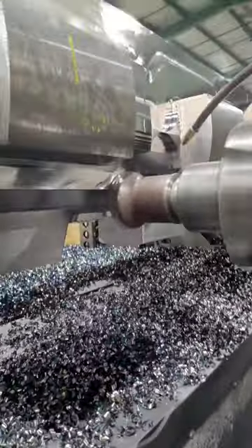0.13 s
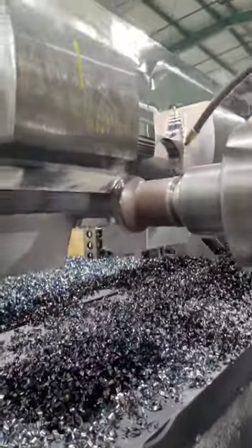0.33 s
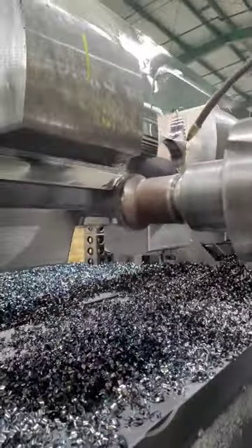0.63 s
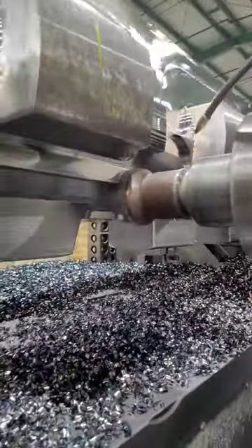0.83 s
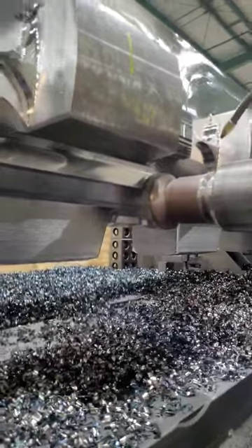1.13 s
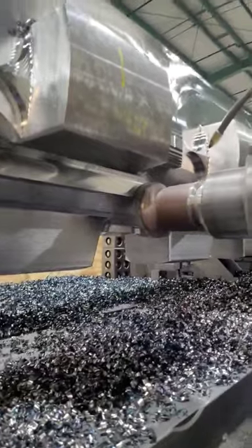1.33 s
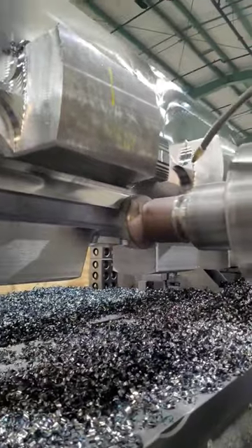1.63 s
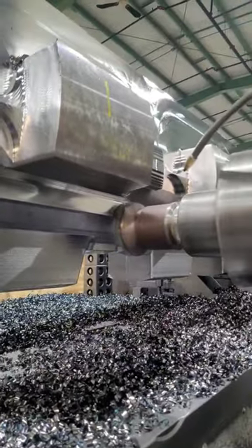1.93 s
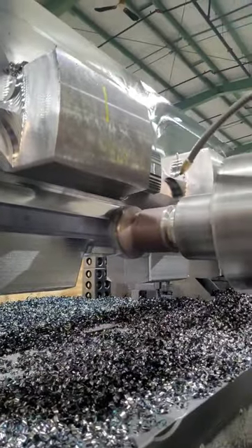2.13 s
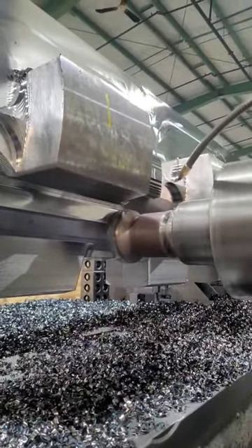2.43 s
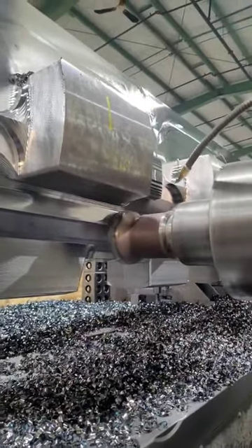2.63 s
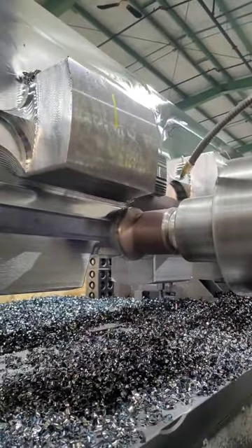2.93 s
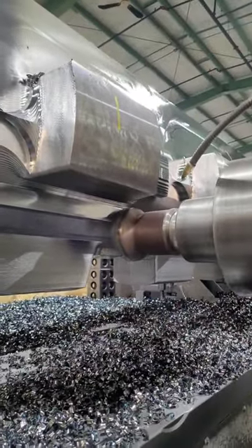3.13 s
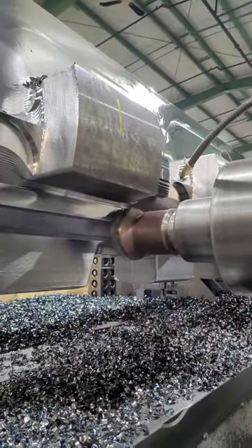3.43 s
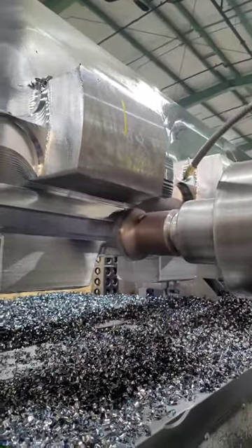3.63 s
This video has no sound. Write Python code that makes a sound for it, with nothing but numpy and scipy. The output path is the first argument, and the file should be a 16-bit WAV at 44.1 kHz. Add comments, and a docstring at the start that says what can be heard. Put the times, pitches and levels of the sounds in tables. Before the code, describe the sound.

A large milling machine cuts steel with rapid, ringing knocks under a high, throbbing whine. An air blast hisses over the factory hall's low rumble throughout, the balance shifting slightly as the close microphone moves.

```python
"""Rapid, ringing knocks under a high, throbbing whine: a large milling machine cuts steel in a factory hall.
A seven-tooth cutter strikes the machine on every turn and sets its parts ringing, from bed to cutter head.
The drive holds one high tone, an air blast hisses over the hall's rumble, and noise rings in drive and
guards. Levels and balance shift as the close stereo microphone slowly moves."""
import sys
import numpy as np
from scipy import signal
from scipy.io import wavfile

SR = 44100
rng = np.random.default_rng(int(sys.argv[2]) if len(sys.argv) > 2 else 0)


def dump_mix(stems):
    """Bounce the given channels to the path in sys.argv[1] as a 16-bit WAV at rate SR."""
    frames = np.atleast_2d(stems).T  # one column per channel
    limited = np.clip(frames, -1, 1)  # hard clip at full scale
    pcm = np.round(limited * 32767).astype(np.int16)
    wavfile.write(sys.argv[1], SR, pcm)


N = 166257

TURNS_PER_S, WHINE_HZ = 7.576, 4529.3

# Ringing modes of the seven machine parts. Pan is left minus right throughout.
# pitch_hz, level_db, t60_s, pan_db, right_lag_ms, signed_gain
BED_MODES = [(54.3, -50.5, 0.7, -3.8, 1.41, 1.0), (98.4, -33.6, 0.7, 0.3, 0.26, 1.0),
             (124.0, -31.7, 0.7, -0.7, 0.19, 1.0)]
COLUMN_MODES = [(142.0, -35.5, 0.213, -1.1, 0.01, 1.0), (159.8, -42.0, 0.7, -0.3, 0.32, 1.0),
                (180.4, -32.6, 0.087, -3.5, -0.13, -1.0), (201.6, -30.5, 0.255, -3.5, 0.21, 1.0),
                (215.5, -30.5, 0.7, -4.2, 0.15, -1.0)]
SADDLE_MODES = [(252.0, -35.0, 0.7, -1.2, -0.02, -1.0), (280.1, -43.1, 0.7, -0.9, -0.02, -1.0),
                (304.6, -40.0, 0.524, -3.9, -0.3, -1.0), (317.8, -35.4, 0.7, -2.2, -0.17, -1.0),
                (334.3, -46.4, 0.7, -3.2, -0.29, 1.0), (373.1, -47.3, 0.7, 6.0, -0.92, -1.0)]
HOUSING_MODES = [(380.3, -39.9, 0.237, 4.8, -0.42, 1.0), (424.7, -43.8, 0.7, -1.0, 0.13, 1.0),
                 (477.5, -49.4, 0.7, 0.3, -0.39, 1.0), (511.6, -46.6, 0.139, 1.6, -0.02, -1.0),
                 (577.7, -43.7, 0.7, -7.2, 0.1, -1.0)]
ARBOR_MODES = [(632.8, -49.1, 0.7, -8.0, 0.16, 1.0), (683.8, -47.4, 0.3, -4.0, 0.0, 1.0),
               (737.7, -40.3, 0.107, -2.9, 0.07, -1.0), (793.1, -38.0, 0.04, 3.0, -0.09, -1.0),
               (852.2, -36.3, 0.052, -5.4, -0.18, 1.0)]
WORKPIECE_MODES = [(908.9, -44.2, 0.202, -3.9, 0.11, -1.0), (967.6, -39., 0.26, -8.0, -0.03, 1.0),
                   (1125.8, -43., 0.437, -3.4, 0.07, 1.0), (1178.0, -43., 0.7, -4.1, 0.13, -1.0)]
HEAD_MODES = [(1006.5, -33, 0.15, -6.5, 0.56, 0.76), (1075, -34.5, 0.12, 4.5, 0.28, -1.14),
              (1182, -35.5, 0.041, -7, 0.11, 1.0), (1293, -29.5, 0.03, -6, 0.3, -1.2)]
# A row per tooth, a column per part, bed to head: push_share (of the hardest; negative springs back)
TOOTH_PUSH = [(0.85, -0.73, -0.12, 0.95, -0.11, 0.25, 0.5), (0.84, 0.42, -0.38, -0.9, 1.0, 1.0, 0.15),
              (0.7, 0.51, 0.49, 0.94, 0.72, 1.0, 0.4), (0.42, 1.0, 1.0, 1.0, 0.58, 0.59, 1.0),
              (0.41, 0.24, -0.3, 0.11, 0.38, 0.71, 0.9), (1.0, -0.6, 0.56, -0.06, 0.86, 0.66, 0.4),
              (0.73, 0.97, 0.27, 0.65, 0.71, 0.44, 0.55)]
# When the first tooth reaches each part within a turn: delay_ms
PUSH_DELAY_MS = [8.12, 10.8, 3.27, 14.62, 18.2, 16.5, 1.5]
# Each part's fade at the moving microphone, from the start of the pre-roll: gain_db, slope_db_per_s
PART_FADES = [(-1.8, 0.35), (1., -0.12), (-1.2, 0.51), (1.8, -0.24), (1.6, -0.28), (-2., 0.25), (-3., 1.1)]
# Level ride on knocks and rumble: time_s, gain_db
LOW_RIDE = [(0, 2.5), (.9, 0.74), (1.8, -0.6), (2.8, -0.63), (3.77, -0.1)]

# Tone of the hall's rumble and of the air blast: pitch_hz, band_gain_db
RUMBLE_EQ = [(30, -5), (70, -13), (130, -3), (260, -4), (400, -7), (600, -14.5), (1000, -7), (1350, -16.5),
             (2000, -13.5), (3000, -14.5)]
HISS_EQ = [(2000, -30), (3200, -8.5), (4000, 1.5), (6000, -0.5), (7500, 0), (8600, -5.5), (10000, -2.5),
           (11300, -1.5), (12500, 2), (13500, 2), (15600, 1)]
# How much of the noise both channels have in common: pitch_hz, common_share
NOISE_COMMON = [(60, .9), (300, .8), (700, .45), (1500, .1), (4000, .25), (15000, .2)]
# Sideways lean of the noise: pitch_hz, pan_db
NOISE_PAN = [(60, 1), (2000, -0.5), (6000, 2.5), (9000, 5.5), (12000, 0.5), (15000, -1.5)]
# Resonances of drive and guards: pitch_hz
RESONANCE_HZ = [71.7, 108, 500.1, 543, 1502, 1995, 4195, 4529, 4836, 4996, 5270, 5680, 7110, 9363, 13050]
# Shape of each of those resonances: width_hz, start_level_db, slope_db_per_s
RESONANCE_SHAPES = [(3.98, -44.5, -0.5), (2.75, -39.5, -3), (2.02, -46, -0.15), (30.4, -45, -.5),
                    (38, -48.5, -1), (140, -47.5, 0.34), (50, -50, 1.5), (78, -28.5, -1.3), (53, -42, 2),
                    (80, -40.5, 0), (45, -39.5, -3), (250, -33, -5), (300, -58, 3), (60.3, -39, -3),
                    (150, -47, 0.5)]
# Ride on hiss and resonances as the microphone turns: time_s, gain_db, pan_db
AIR_RIDE = [(0, 3, -3), (.6, 2, -3), (1.2, 2.5, -4), (1.9, 1, -4.5), (2.5, 1, -5), (3.1, 0.2, -5),
            (3.77, 0.7, -3.5)]

# The whine's three partials at the moving microphone: time_s, left_db, right_db, extra_left_path_mm,
# second_left_db, second_right_db, third_left_db, third_right_db
WHINE_PATH = [(0, -23, -23, 38, -35, -42, -36, -43), (.15, -18, -31, 38, -35, -42, -35, -43),
              (.3, -17, -20.5, 21, -32, -47, -36, -40), (.5, -24, -16, 22, -31, -47, -43, -43),
              (.8, -25, -32, -4, -33.5, -36, -52, -36), (.97, -35, -21, -2, -33.5, -36, -52, -34),
              (1.2, -26, -20.5, 23, -37, -37, -52, -42), (1.5, -25.5, -20, 17, -39.5, -40.5, -55, -35),
              (1.7, -27.5, -15.5, 16, -34, -39, -55, -33), (2.2, -25.5, -13, 35, -34.5, -40, -55, -32),
              (2.6, -23.5, -15, 43, -33, -39.5, -48, -37.5), (3.0, -26.5, -19, 56, -33, -51, -50, -39),
              (3.4, -27, -21, 68, -38, -54, -45, -47), (3.77, -37, -21, 55, -36, -43, -48, -46)]
# Each partial in the right channel, the second one flipped: polarity
RIGHT_POLARITY = [1, -1, 1]
# Side tones that make the whine throb: offset_in_turn_rates, level_db, start_phase_rad
SIDE_TONES = [(-8, -41, -1.2), (-7, -40, 1.2), (-4, -40, -1.3), (-2, -35, -1.4), (2, -36, .9),
              (4, -41, 2.1), (7, -44, .3)]


def from_db(db):
    """Decibels to gain."""
    return 10 ** (np.asarray(db) / 20)


def unit_rms(x):
    """Normalise to an rms of 1."""
    return x / np.sqrt(np.mean(x ** 2) + 1e-20)


def automation(rows):
    """One curve per column, gliding between the times in the first."""
    times, *columns = np.transpose(rows)
    return [np.interp(np.arange(N) / SR, times, column) for column in columns]


def at_pitch(points, hz):
    """Read a curve along a logarithmic pitch axis."""
    pitches, values = np.transpose(points)
    return np.interp(np.log(hz), np.log(pitches), values)


def drift(rate_hz):
    """Smooth random modulation with a spread of about 1."""
    hop, settle = 40, 2000
    pole = np.exp(-2 * np.pi * rate_hz * hop / SR)
    white = rng.standard_normal(N // hop + settle + 2)
    slow = signal.lfilter([1], [1, -2 * pole, pole * pole], white)[settle:]
    return np.interp(np.arange(N) / hop, np.arange(len(slow)), unit_rms(slow))


def pan(pan_db):
    """Left and right gains; positive leans left."""
    return from_db(np.array([[.5], [-.5]]) * pan_db)


def cutter_knocks(scatter_db=.4, preroll_s=1.1):
    """Evenly spaced teeth strike every part's modes; a pre-roll has them ringing from the outset."""
    hit_s = np.arange(-56, 210) / (7 * TURNS_PER_S) + preroll_s
    out = np.zeros((2, N + 2 * SR))
    parts = [BED_MODES, COLUMN_MODES, SADDLE_MODES, HOUSING_MODES, ARBOR_MODES, WORKPIECE_MODES, HEAD_MODES]
    for part, modes in enumerate(parts):
        gain_db, slope = PART_FADES[part]
        blows = np.resize(np.array(TOOTH_PUSH)[:, part], len(hit_s))
        blows = blows * from_db(gain_db + slope * hit_s + scatter_db * rng.standard_normal(len(hit_s)))
        for hz, db, t60, pan_db, lag_ms, signed_gain in modes:
            clicks = np.full(out.shape, 1e-18)
            for channel, late_ms in enumerate([-lag_ms / 2, lag_ms / 2]):
                arrival_s = hit_s + (PUSH_DELAY_MS[part] + late_ms) / 1000
                clicks[channel, np.round(arrival_s * SR).astype(int)] = blows
            pole, angle = from_db(-60 / (t60 * SR)), 2 * np.pi * hz / SR
            ring = signal.lfilter([0, np.sin(angle)], [1, -2 * pole * np.cos(angle), pole * pole], clicks)
            out += signed_gain * from_db(db) * pan(pan_db) * ring
    start = round(preroll_s * SR)
    return out[:, start:start + N]


def stereo_white(right_lag_s=.00012):
    """Common noise that reaches the right channel late, and each channel's own noise."""
    common, own = rng.standard_normal(N), rng.standard_normal((2, N))
    return np.array([common, np.roll(common, int(right_lag_s * SR))]), own


def place_noise(white, hz):
    """Blend common and own noise to the stereo width and lean of this pitch."""
    common, own = white
    share = at_pitch(NOISE_COMMON, hz)
    return pan(at_pitch(NOISE_PAN, hz)) * (np.sqrt(share) * common + np.sqrt(1 - share) * own)


def flickering_noise(eq, low_hz, bands, per_octave, flicker_db):
    """A stack of narrow noise bands, each flickering on its own; rms 1."""
    out, whites = 0, [stereo_white(), stereo_white()]
    edges = low_hz * 2 ** (np.arange(bands + 1) / per_octave)
    for k, (low, high) in enumerate(zip(edges, edges[1:])):
        hz = np.sqrt(low * high)
        bandpass = signal.butter(2, [low, high], "band", fs=SR, output="sos")
        band = signal.sosfilt(bandpass, place_noise(whites[k % 2], hz))
        out = out + from_db(at_pitch(eq, hz) + flicker_db * drift(12)) * band
    return unit_rms(out)


def hall_rumble():
    """The hall's low wash of noise, leaning a little right."""
    noise = flickering_noise(RUMBLE_EQ, low_hz=29.98, bands=20, per_octave=3, flicker_db=1.9)
    return from_db(-30.5) * pan(-1.6) * noise


def air_blast():
    """Rushing air: three octaves of bright hiss."""
    return from_db(-25.5) * flickering_noise(HISS_EQ, low_hz=1999, bands=18, per_octave=6, flicker_db=1.38)


def breathy_resonances(flicker_db=1.5, swell_db=7, swell_peak_s=1.15, swell_spread_s=.5):
    """Noise rings through narrow resonances of drive and guards; two high ones swell for a while."""
    out, white, t = 0, stereo_white(), np.arange(N) / SR
    swell = swell_db * np.exp(-((t - swell_peak_s) / swell_spread_s) ** 2)
    for hz, (width_hz, db, slope) in zip(RESONANCE_HZ, RESONANCE_SHAPES):
        pole = np.exp(-np.pi * width_hz / SR)
        resonator = [1, 0, -1, 1, -2 * pole * np.cos(2 * np.pi * hz / SR), pole * pole]
        ring = unit_rms(signal.sosfilt([resonator, resonator], place_noise(white, hz)))
        level_db = db + slope * t + swell * (hz in (4195, 5270)) + flicker_db * drift(6.2)
        out = out + from_db(level_db) * ring
    return out


def drive_whine(waver_db=.8, waver_rad=.12, wander_rad=.6):
    """Three wavering partials; side tones, whole turn rates away, beat against the lowest."""
    left_db, right_db, path_mm, *overtone_db = automation(WHINE_PATH)
    out, t = 0, np.arange(N) / SR
    delay_s = np.array([path_mm, np.zeros(N)]) / 343000  # speed of sound in mm/s
    phase = 2 * np.pi * WHINE_HZ * (t - delay_s)
    for k, gain in enumerate(from_db([[left_db, right_db], overtone_db[:2], overtone_db[2:]])):
        level_waver = from_db(waver_db * np.array([drift(12), drift(12)]))
        phase_waver = waver_rad * np.array([drift(12), drift(12)])
        polarity = np.array([[1], [RIGHT_POLARITY[k]]])
        out = out + polarity * gain * level_waver * np.sin((k + 1) * phase + phase_waver)
    for offset, db, start_rad in SIDE_TONES:
        wander = wander_rad * np.array([drift(1), drift(1)])
        beat_phase = 2 * np.pi * offset * TURNS_PER_S * t + start_rad
        out = out + from_db(db) * np.sin(phase + beat_phase + wander)
    return out


def scene():
    """Mix knocks and rumble, airy noise and whine as the moving microphone hears them."""
    low_db, = automation(LOW_RIDE)
    air_db, air_pan_db = automation(AIR_RIDE)
    low = cutter_knocks() + hall_rumble()
    air = air_blast() + breathy_resonances()
    return from_db(low_db) * low + from_db(air_db) * pan(air_pan_db) * air + drive_whine()


def record(dry):
    """The microphone loses the deep bass; the very top is cut steeply."""
    low_cut = signal.butter(2, 44, "high", fs=SR, output="sos")
    high_cut = signal.ellip(16, .3, 70, 15470, fs=SR, output="sos")
    return signal.sosfilt(high_cut, signal.sosfilt(low_cut, dry))


dry = scene()
out = record(dry)
dump_mix(out)
```